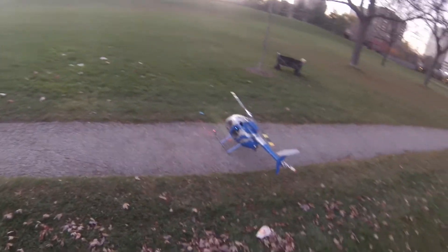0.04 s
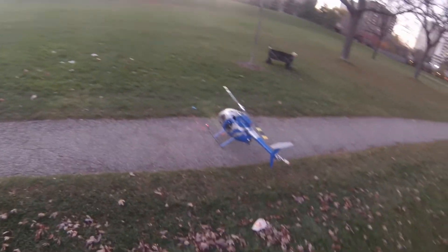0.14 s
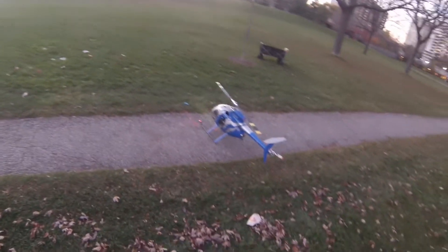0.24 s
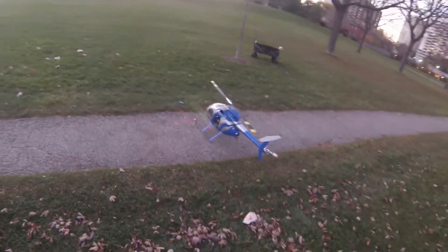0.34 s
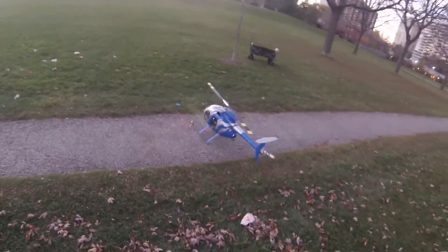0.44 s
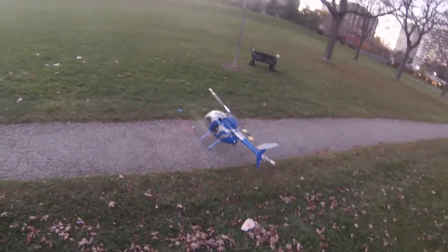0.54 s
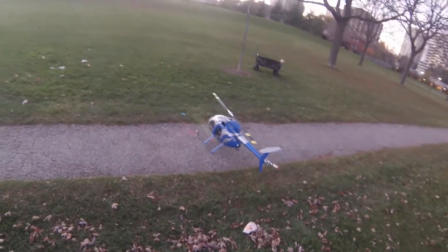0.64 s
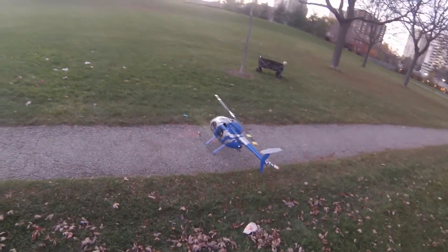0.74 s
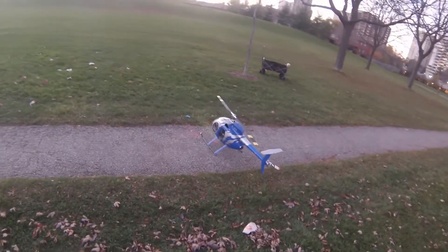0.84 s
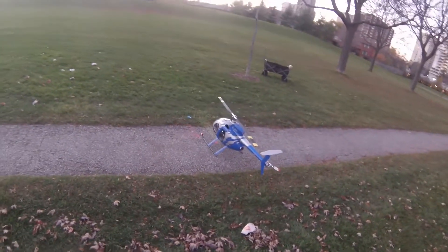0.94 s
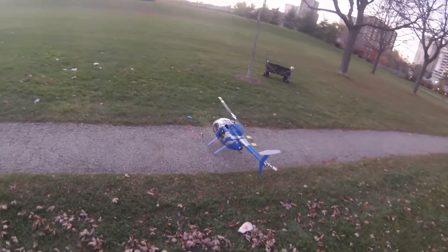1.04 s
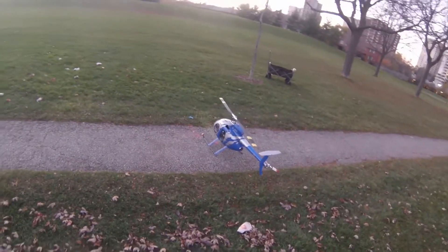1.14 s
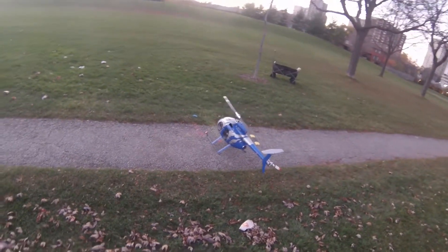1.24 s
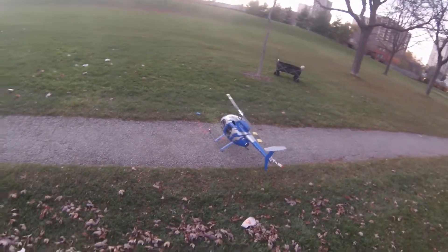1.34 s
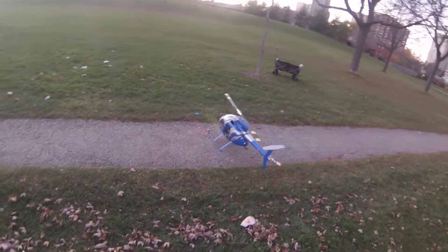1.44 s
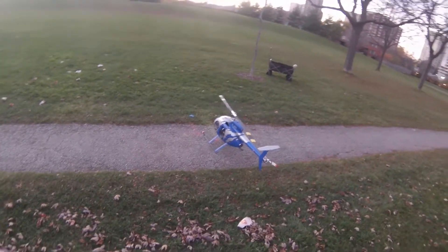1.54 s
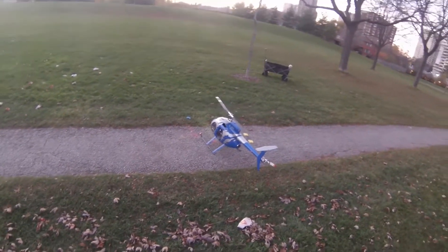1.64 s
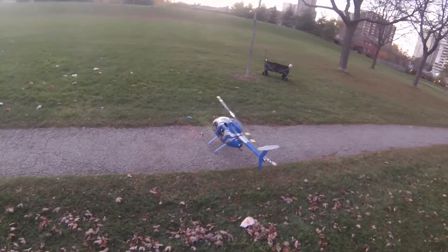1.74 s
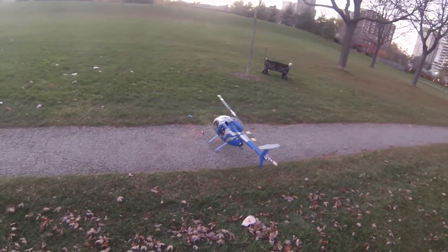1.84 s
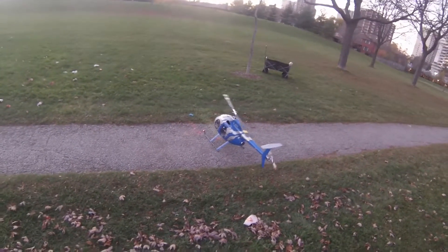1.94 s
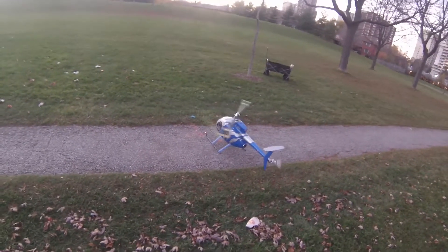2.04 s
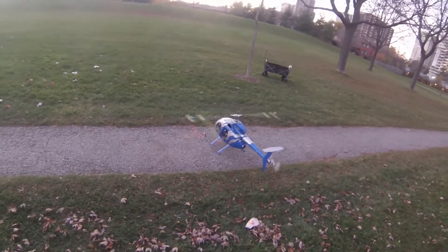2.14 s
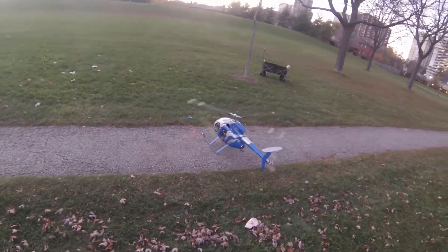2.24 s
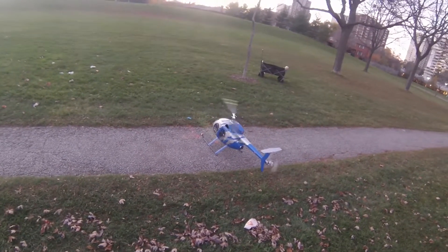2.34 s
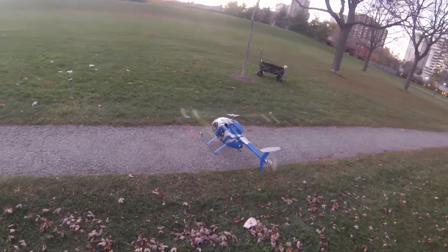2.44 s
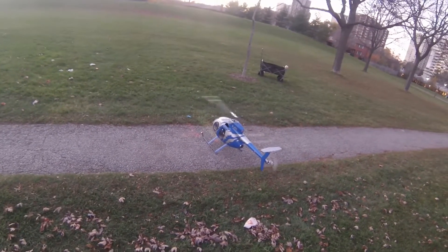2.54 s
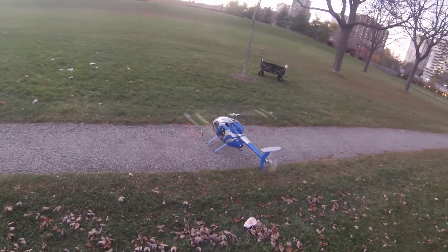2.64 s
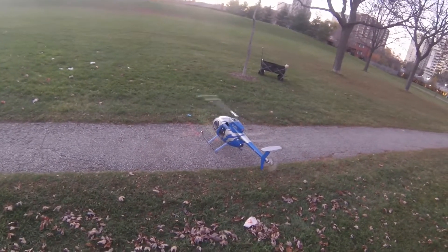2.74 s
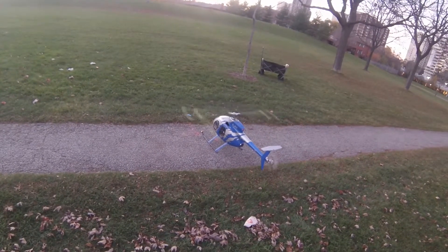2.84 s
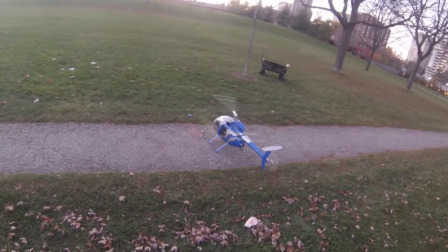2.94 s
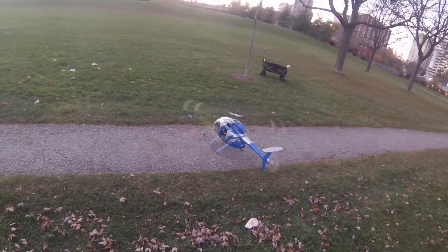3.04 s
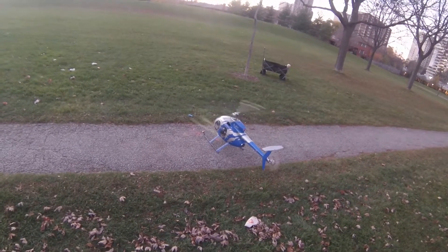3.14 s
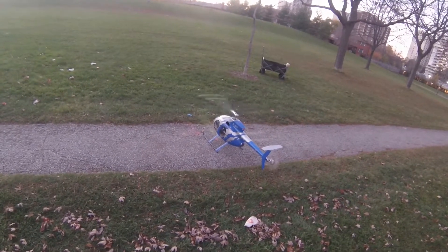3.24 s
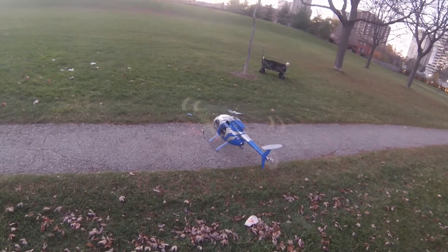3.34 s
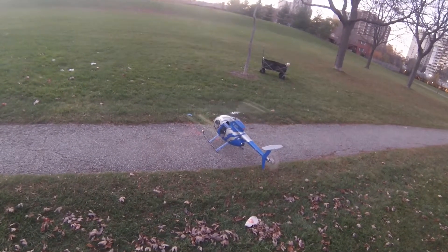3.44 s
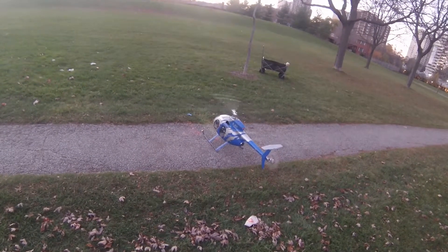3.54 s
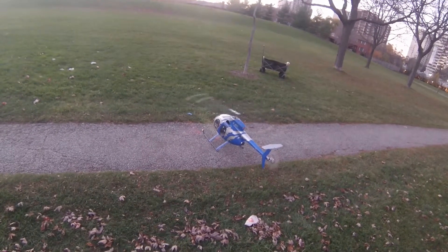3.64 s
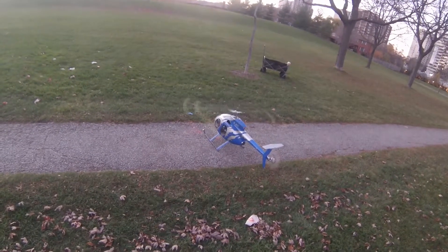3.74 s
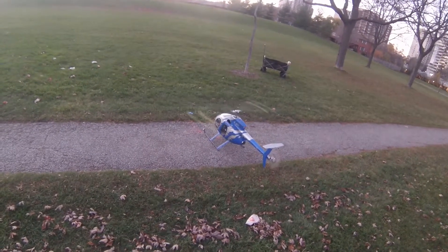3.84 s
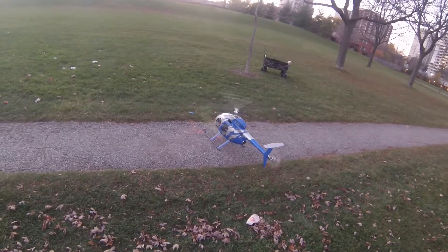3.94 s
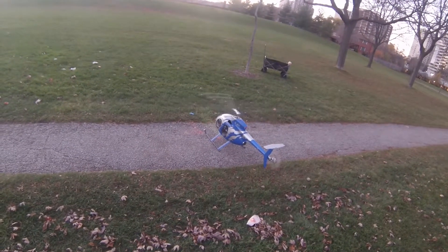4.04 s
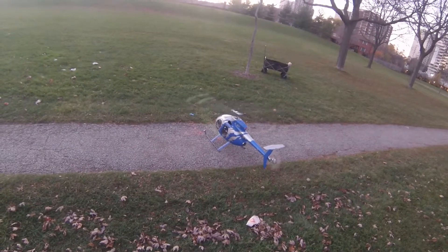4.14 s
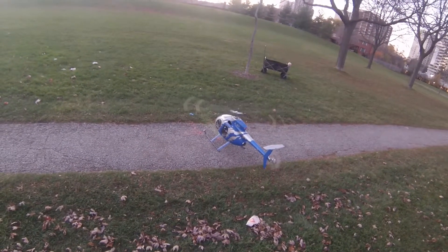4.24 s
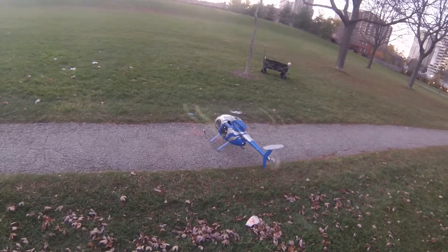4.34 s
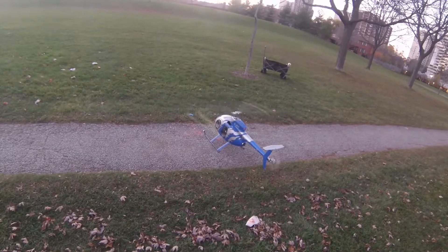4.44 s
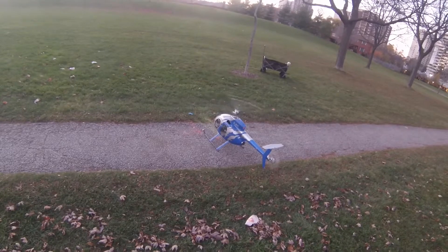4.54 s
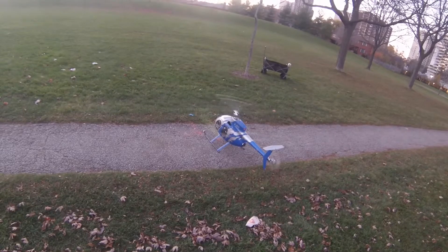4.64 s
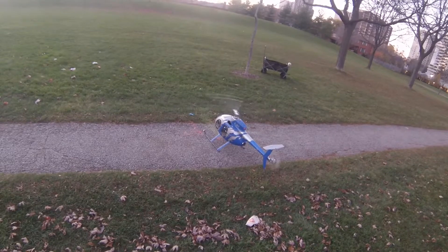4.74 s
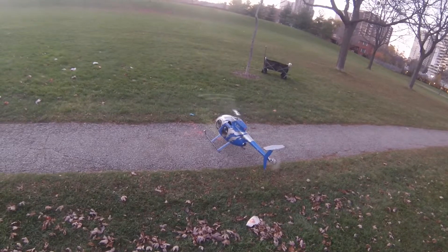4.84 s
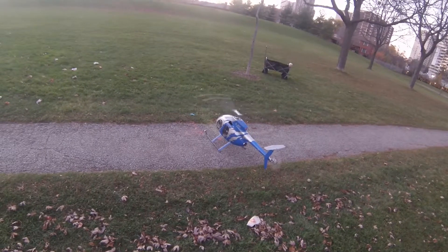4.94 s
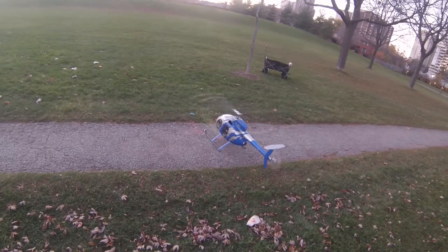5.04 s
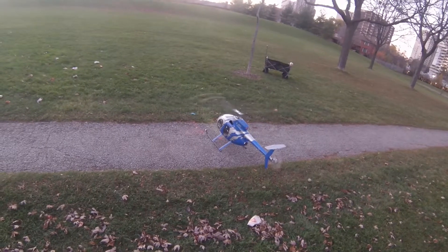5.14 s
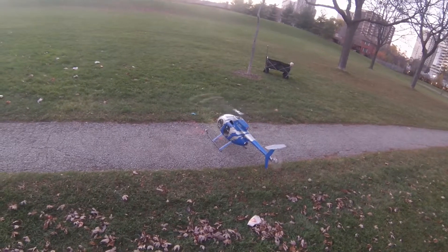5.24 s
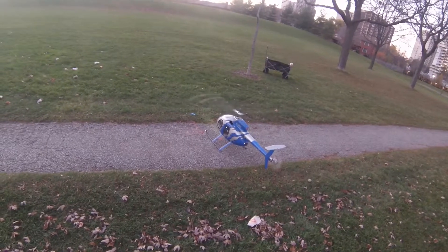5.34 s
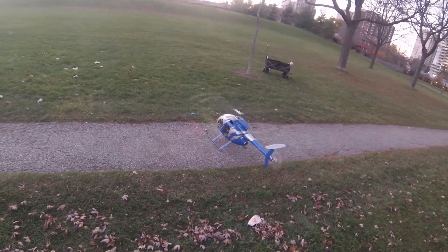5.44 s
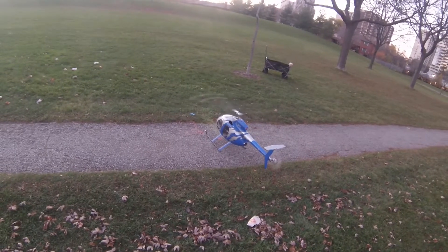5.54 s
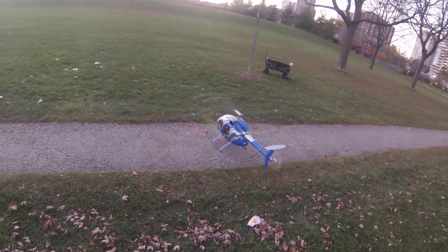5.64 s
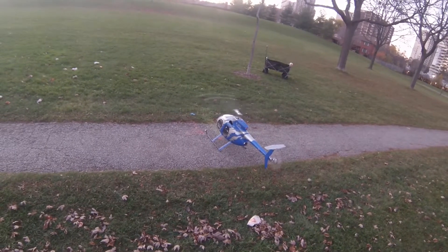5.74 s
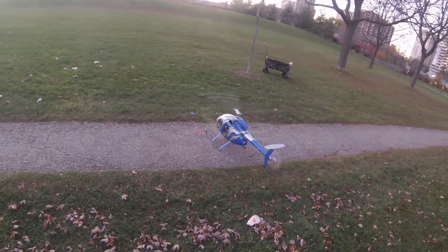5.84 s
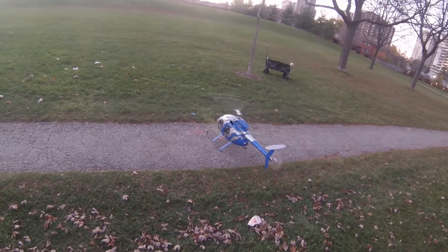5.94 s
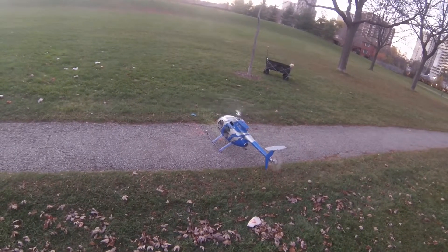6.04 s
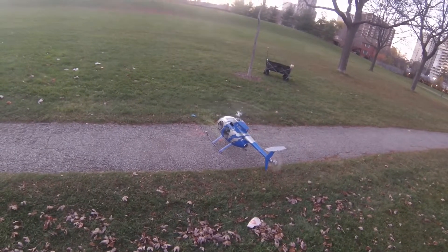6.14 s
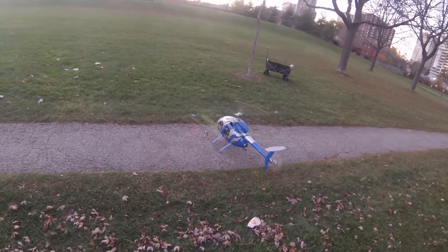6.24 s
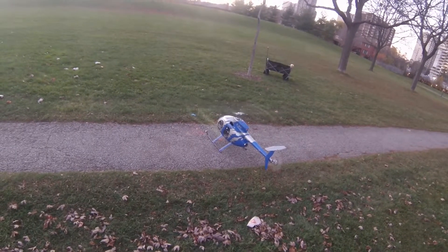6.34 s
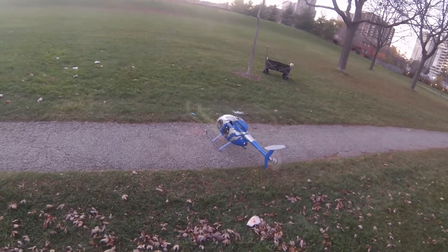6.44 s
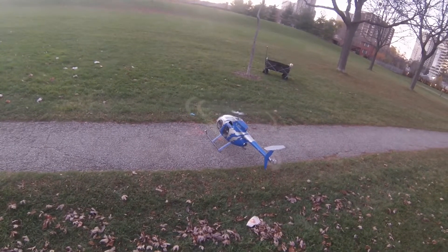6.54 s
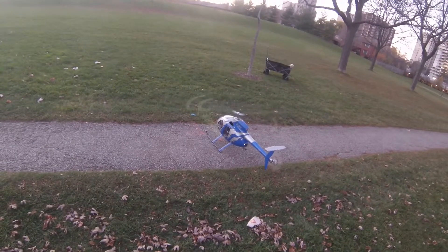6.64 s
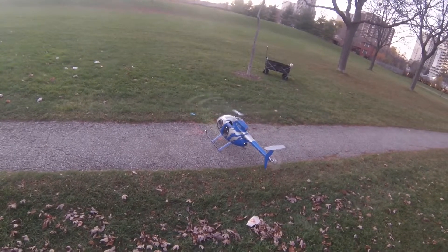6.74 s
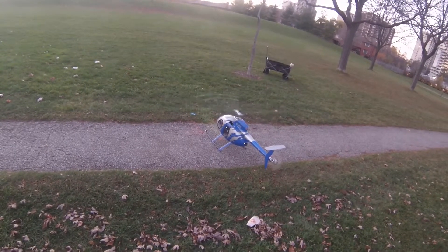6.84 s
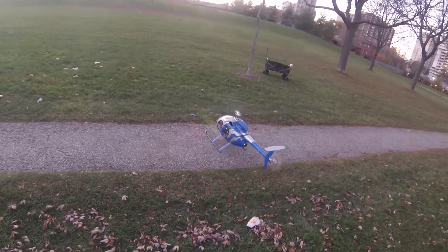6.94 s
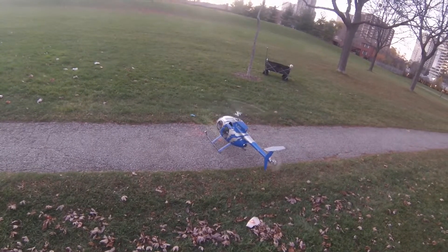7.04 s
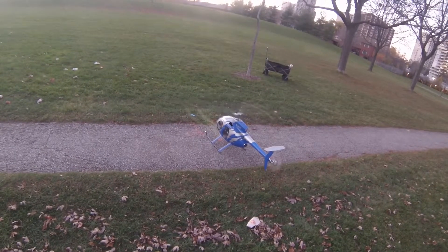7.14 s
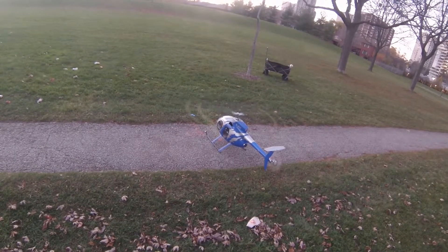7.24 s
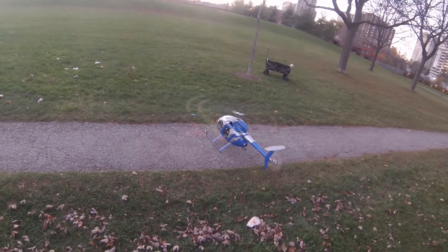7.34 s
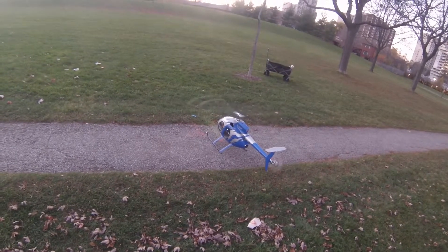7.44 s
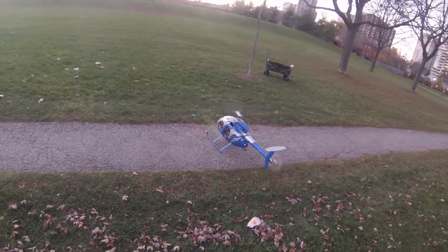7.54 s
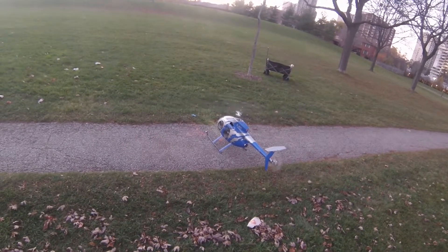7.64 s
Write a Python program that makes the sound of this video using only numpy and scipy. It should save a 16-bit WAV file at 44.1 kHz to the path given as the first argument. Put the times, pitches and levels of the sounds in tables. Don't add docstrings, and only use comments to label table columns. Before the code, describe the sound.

Outdoors, a model helicopter's drive idles with a low, boxy roar and thin whine. Its motor and rotor gather speed without pause, several high gear tones sliding upward and swelling in short bites. The roar thickens by two seconds and grows rougher under load, with brighter fan hiss. No take-off or slowing follows. One close, enclosed camera microphone colours everything, with light wind rumble and far traffic underneath.

```python
import sys
import numpy as np
from scipy import signal
from scipy.io import wavfile
from scipy.ndimage import uniform_filter1d

SR = 44100
rng = np.random.default_rng(int(sys.argv[2]) if len(sys.argv) > 2 else 0)


def store_pcm(level_fs):
    pcm = np.round(np.clip(level_fs, -1, 1) * 32767).astype(np.int16)
    wavfile.write(sys.argv[1], SR, np.atleast_2d(pcm).T)


def invert_db(level):
    return 10 ** (np.asarray(level, dtype=float) / 20)


N = 339129

# time in seconds, first mesh of the slow shaft in Hz, of the fast shaft in Hz.
SPEEDS = [(0.0, 2257, 6324), (0.5, 2405, 6445), (1.25, 2655, 6654), (2.0, 2922, 6894), (2.75, 3207, 7143),
          (3.5, 3528, 7421), (4.0, 3755, 7612), (4.5, 4004, 7848), (5.0, 4281, 8105), (5.5, 4584, 8409),
          (5.75, 4749, 8539), (6.0, 4916, 8629), (6.25, 5089, 8683), (6.5, 5258, 8722), (6.75, 5418, 8752),
          (7.0, 5574, 8747), (7.25, 5720, 8752), (7.69, 5957, 8765)]
SLOW_IDLE_HZ, SLOW_TOP_HZ = 2257, 5957
# time in seconds, share from 0 (idle) to 1 (at speed).
SPOOL = [(0, 0.68), (1.5, 0.35), (2.5, 0.7), (3.5, 0.85), (4.5, 1), (7.69, 1)]
# time in seconds, load from 0 to 1.
LOAD = [(0, 0.15), (.2, 0), (.6, 0), (1.2, 0.22), (1.7, 0.23), (2.4, 0.41), (2.76, 0.22), (3.15, 0.88),
        (3.5, 0.51), (4.15, 0.58), (4.75, 0.79), (5.0, 0.84), (5.3, 0.88), (5.9, .9), (6.25, 0.67),
        (6.8, 0.69), (7.3, 0.85), (7.69, .6)]

# time in seconds, level in dB.
ROAR = [(0.0, -44), (0.04, -40.5), (0.43, -42.5), (1.48, -38.5), (1.99, -33), (3.79, -31.5), (3.81, -33.5),
        (4.82, -33), (5.03, -30), (5.33, -33), (5.76, -29), (5.89, -32), (7.35, -33), (7.54, -28.5),
        (7.58, -35.5), (7.63, -27), (7.65, -33), (7.69, -31)]
# frequency in Hz, density in dB per Hz.
DRONE_COLOUR = [(76, -49), (130, -25), (189, -9), (247, -8), (308, -1), (406, -6), (500, -25), (650, -52.5),
                (1100, -120)]
# frequency in Hz, density in dB per Hz.
DRONE_IDLE = [(76, -50), (130, -20.5), (215, -13), (286, -4.5), (360, -14), (393, -37), (450, -29.5),
              (580, -56), (990, -120)]
# frequency in Hz, density in dB per Hz.
ROAR_COLOUR = [(290, -62), (500, -40.5), (545, -17), (594, -9), (706, -6), (796, 0), (1000, -0.5),
               (1300, -18.5), (1400, -28), (1820, -49.5), (3080, -120)]
# frequency in Hz, density in dB per Hz.
ROAR_IDLE = [(260, -64), (450, -46), (516, -4.5), (677, -18.5), (755, -4.5), (811, -0.5), (1070, 3),
             (1320, -21.5), (1400, -17.5), (1820, -43), (3080, -120)]
# frequency in Hz, density in dB per Hz.
UPPER_COLOUR = [(790, -32), (1350, -8.5), (1440, -9.5), (1570, -2.5), (1690, 0), (2120, -17), (2760, -52.5),
                (4660, -120)]

SLOW_TEETH = [25, 32.02, 35]
FAST_TEETH = [16, 20, 25, 27.97]
# middle in seconds, length in seconds, level in dB.
FIRST_SWELLS = [(.06, 0.26, -56), (.24, 0.14, -50), (.4, 0.14, -56.5), (.85, 0.14, -58.5),
                (1.15, 0.28, -50), (1.4, 0.06, -45.5), (1.65, 0.17, -46.5), (1.95, 0.1, -48.5),
                (2.27, 0.21, -43.5), (2.52, 0.13, -46.5), (2.68, 0.12, -51), (2.9, 0.17, -53),
                (3.25, 0.16, -55.5), (3.55, 0.21, -60.5), (3.95, .2, -61), (4.45, 0.24, -54),
                (4.63, .12, -60), (4.8, 0.086, -48), (5.05, .15, -51), (5.22, 0.092, -55),
                (5.4, 0.12, -38.5), (5.63, 0.21, -44.5), (5.87, 0.14, -50.5), (6.1, 0.12, -51),
                (6.43, 0.17, -49), (6.62, 0.064, -48.5), (6.85, 0.14, -50.5), (7.03, .08, -52),
                (7.35, 0.25, -58), (7.55, 0.18, -59)]
# middle in seconds, length in seconds, level in dB.
SECOND_SWELLS = [(.5, .15, -62), (.78, .2, -57), (3.582, 0.14, -53.5), (3.8, .15, -57.5), (4.0, .2, -59),
                 (4.49, 0.11, -49.5), (4.767, 0.14, -47.5), (5.0, 0.1, -56), (5.2, .15, -52.5),
                 (5.398, 0.22, -53), (5.798, .12, -63), (6.08, .2, -58.5), (6.45, 0.18, -62.5),
                 (7.03, 0.3, -69), (7.376, 0.14, -65)]
# middle in seconds, length in seconds, level in dB.
THIRD_SWELLS = [(0.0, 0.083, -54), (.3, 0.12, -52.5), (0.743, 0.24, -55.5), (1.013, 0.19, -58),
                (1.326, 0.18, -58.5), (1.617, 0.09, -59), (1.813, 0.085, -61), (2.042, 0.067, -55),
                (2.27, .3, -55), (2.55, 0.24, -61), (2.903, 0.26, -49.5), (3.177, 0.21, -49),
                (3.47, .15, -61), (3.8, 0.18, -58.5), (4.03, 0.29, -55.5), (4.454, 0.16, -51.5),
                (4.77, .12, -55), (5.1, 0.25, -63), (5.38, 0.19, -63), (5.72, 0.16, -66)]
BETWEEN_SWELLS_DB = [-74, -90, -88]
# middle in seconds, length in seconds, level in dB.
LOWER_SWELLS = [(3.3, 0.26, -60), (3.6, .15, -57), (3.85, 0.25, -57), (4.54, .3, -66), (5.37, .13, -66),
                (5.61, .24, -61.5), (5.82, .11, -67)]
# middle in seconds, length in seconds, level in dB.
UPPER_SWELLS = [(3.58, .12, -69), (4.03, .3, -66), (4.48, .15, -58), (4.76, 0.14, -56)]
# middle in seconds, half length in seconds, ratio to the first slow mesh, level in dB.
PASSING = [
    (3.37, .25, 1.5, -66),
    (6.4, .35, 1.2, -74),
    (7.0, .25, 1.115, -74),
    (7.15, 1.1, .338, -60),
]
# frequency in Hz, width in Hz, level in dB.
SHELL = [(4500, 250, -57.5), (5290, 150, -66), (6320, 200, -78), (7360, 150, -80), (7900, 150, -84.5),
         (8300, 150, -78.5), (8565, 150, -74), (8760, 100, -75.5), (9940, 200, -87.5), (10880, 200, -88),
         (11450, 200, -83)]

# frequency in Hz, density in dB per Hz.
HISS_COLOUR = [(1210, -35), (2050, -8.5), (2290, 0.5), (2470, -6.5), (2710, -0.5), (3060, 3), (3170, -3),
               (3460, -16.5), (3850, -16), (4640, -4), (5010, -16), (5410, -12), (5890, -23), (6530, -25.5),
               (6900, -40.5), (8970, -59), (15200, -120)]
# frequency in Hz, density in dB per Hz.
TOP_COLOUR = [(3940, -34), (6700, -3.5), (7040, -8), (7340, -4.5), (7760, -9.5), (8000, -7.5), (8390, 0),
              (8700, -6), (8960, -8), (9350, -13.5), (9910, -9.5), (10300, -15.5), (11200, -10),
              (11700, -8), (13000, -26.5)]
# level at rest in dB, rise at full load in dB, rise at full speed in dB.
HISS_LAWS = [
    (-57.5, 7.9, .1),
    (-62.5, 10.5, .4),
    (-88, 3, 14.7),
    (-86.5, 2.5, 4),
]
# middle in seconds, length in seconds, level in dB relative to the
PUFFS = [(0.02, 0.23, 2.5), (1.45, .2, -14), (3.2, 0.094, -7.5), (4.42, .1, 1), (4.78, 0.1, -1),
         (5.25, .2, -2), (6.77, .12, 3)]

# frequency in Hz, density in dB per Hz.
WIND_COLOUR = [(12, -32), (20, -4.5), (57, 3), (129, -4), (150, -7.5), (200, -39.5), (330, -120)]
# middle in seconds, length in seconds, level in dB.
GUSTS = [(2.4, 0.43, -64.5), (3.4, .4, -65.5), (5.15, 0.53, -62), (5.9, 0.16, -57.5), (6.33, 0.37, -57),
         (6.65, 0.26, -59.5), (7.69, .1, -61)]


def evened(x):
    return x / np.sqrt(np.mean(abs(x) ** 2) + 1e-20)


def read(points, hz):
    f, value = np.transpose(points)
    return np.interp(np.log(hz + 1), np.log(f + 1), value, left=-150, right=-150)


def columns(rows, t):
    s, *cols = np.transpose(rows)
    return [np.interp(t, s, c) for c in cols]


def swells(rows, floor_db):
    steepness = 2.25
    t = np.arange(0, N + 64, 64) / SR
    power = invert_db(2 * floor_db)
    for middle, length, db in rows:
        power = power + invert_db(2 * (db - 2.73 * abs(2 * (t - middle) / length) ** steepness))
    return np.interp(np.arange(N) / SR, t, 10 * np.log10(power))


def effort(rest_db, load_db, speed_db):
    t = np.arange(N) / SR
    speed = (columns(SPEEDS, t)[0] - SLOW_IDLE_HZ) / (SLOW_TOP_HZ - SLOW_IDLE_HZ)
    return rest_db + load_db * columns(LOAD, t)[0] + speed_db * speed


def wander(rate_hz, size=N):
    step = 64
    z = rng.standard_normal((size // step + 2, 2)) @ [1, 1j]
    z = signal.lfilter(*signal.butter(1, rate_hz, fs=SR / step), z)
    z = uniform_filter1d(z, size=2)
    return evened(np.interp(np.arange(size) / step, np.arange(len(z)), z))


def air(colour, patchy_db, flicker_db, size, idle=None):
    hop = size // 4
    frames, hz = N // hop + 5, np.fft.rfftfreq(size, 1 / SR)
    a, b, patches = rng.standard_normal((frames, len(hz), 3)).T
    patches = uniform_filter1d(patches, size // 100, 0)
    patches = evened(uniform_filter1d(patches, 4000 // hop, 1))
    gusts = uniform_filter1d(rng.standard_normal(frames), 2500 // hop)
    gusts = evened(uniform_filter1d(gusts, 2500 // hop))

    share = np.clip(columns(SPOOL, np.arange(frames) * hop / SR)[0], 0, 1)
    at_speed = read(colour, hz)[:, None]
    at_idle = read(idle or colour, hz)[:, None]
    shape = invert_db(share * at_speed + (1 - share) * at_idle)
    shape = shape / np.linalg.norm(shape, axis=0)
    z = (a + 1j * b) * shape * invert_db(patchy_db * patches + flicker_db * gusts)
    return evened(signal.istft(z, nperseg=size, noverlap=size - hop)[1][:N])


def roar():
    level_db = columns(ROAR, np.arange(N) / SR)[0]
    body = air(ROAR_COLOUR, patchy_db=.6, flicker_db=.3, size=2048, idle=ROAR_IDLE)
    drone = air(DRONE_COLOUR, patchy_db=.5, flicker_db=.3, size=2048, idle=DRONE_IDLE)
    upper = air(UPPER_COLOUR, patchy_db=.8, flicker_db=.4, size=2048)
    throb = invert_db(1.3 * evened(uniform_filter1d(wander(70).real, size=100)))
    out = invert_db(level_db) * evened(throb * body)
    out += invert_db(effort(rest_db=-53, load_db=.1, speed_db=8.4)) * drone
    out += invert_db(effort(rest_db=-54, load_db=14.35, speed_db=.1)) * evened(throb * upper)
    return out


def tone(hz, level_db, blur, blur_hz):
    scatter = np.sqrt(1 - blur ** 2) + blur * wander(blur_hz, size=len(hz))
    spin = np.exp(2j * np.pi * np.cumsum(hz) / SR)
    return invert_db(level_db) * np.sqrt(2) * (scatter * spin).real


def shaft(mesh_hz, levels_db, teeth, blur, blur_hz):
    return sum(tone(mesh_hz * n / teeth[0], db, blur, blur_hz) for n, db in zip(teeth, levels_db))


def shell(hz):
    slope = 1.27
    power = sum(invert_db(2 * db) / (1 + (2 * (hz - f) / width) ** 2) ** slope for f, width, db in SHELL)
    return 10 * np.log10(power)


def whine():
    t = np.arange(N) / SR
    slow_hz, fast_hz = columns(SPEEDS, t)
    turn_hz = fast_hz / FAST_TEETH[0]
    slow_db = map(swells, [FIRST_SWELLS, SECOND_SWELLS, THIRD_SWELLS], BETWEEN_SWELLS_DB)
    fast_db = [shell(turn_hz * n) + db for n, db in zip(FAST_TEETH, [2.8, -16, -1, -4])]
    out = invert_db(-1.5) * shaft(slow_hz, slow_db, SLOW_TEETH, blur=.48, blur_hz=18)
    out += invert_db(1.5) * shaft(fast_hz, fast_db, FAST_TEETH, blur=.75, blur_hz=16)
    out += tone(2 * slow_hz, shell(2 * slow_hz) - 4.5, blur=.5, blur_hz=10)

    out += tone(slow_hz - turn_hz, swells(LOWER_SWELLS, -95) + 1.5, blur=.6, blur_hz=10)
    out += tone(slow_hz + turn_hz, swells(UPPER_SWELLS, -95) + 1.5, blur=.6, blur_hz=10)
    for middle, length, factor, db in PASSING:
        near = abs(t - middle) < length
        level_db = db - 40 * ((t[near] - middle) / length) ** 4
        out[near] += tone(factor * slow_hz[near], level_db, blur=.6, blur_hz=10)
    return out


def echoes(x, t60):
    t = np.arange(round(t60 * SR)) / SR
    tail = rng.standard_normal(len(t)) * invert_db(-60 * t / t60) * (t > .006)
    return signal.fftconvolve(x, tail / np.linalg.norm(tail))[:N]


def halves(x, edge_hz):
    low = signal.sosfiltfilt(signal.butter(4, edge_hz, fs=SR, output="sos"), x)
    return evened(low), evened(x - low)


def hiss():
    parts = halves(air(HISS_COLOUR, patchy_db=1.0, flicker_db=.6, size=1024), 3450)
    parts += halves(air(TOP_COLOUR, patchy_db=.8, flicker_db=.8, size=1024), 9300)
    low, *bright = (invert_db(effort(*law)) * part for law, part in zip(HISS_LAWS, parts))
    return low + invert_db(swells(PUFFS, 0)) * sum(bright)


def wind():
    calm_db = -64.5
    return invert_db(swells(GUSTS, calm_db)) * air(WIND_COLOUR, patchy_db=-0.1, flicker_db=-0.7, size=4096)


def scene():
    drive = roar()
    direct = whine()
    late = invert_db(-8) * echoes(direct, t60=.5)
    microphone_noise = invert_db(-90.0) * rng.standard_normal(N)
    return (drive + direct + late + hiss() + wind() + microphone_noise)[None]


def top_cut(x):
    return signal.sosfilt(signal.butter(12, 13360, fs=SR, output="sos"), x)


def record(dry):
    low_pass = signal.firwin(511, 12800, window=("kaiser", 9), fs=SR)
    limited = signal.oaconvolve(dry, low_pass[None], "same")
    blocks = rng.random((N // 1024 + 1, 2)) < [.24, .12]
    gates = np.repeat(blocks, 1024, axis=0)[:N] * 1.
    gates = uniform_filter1d(gates, size=300, axis=0)
    flecks = gates[:, 0] * tone(np.full(N, 13170), -96, blur=.9, blur_hz=25)
    flecks += gates[:, 1] * tone(np.full(N, 12930), -101, blur=.9, blur_hz=25)
    return top_cut(limited + flecks)


dry = scene()
out = record(dry)
store_pcm(out)
```